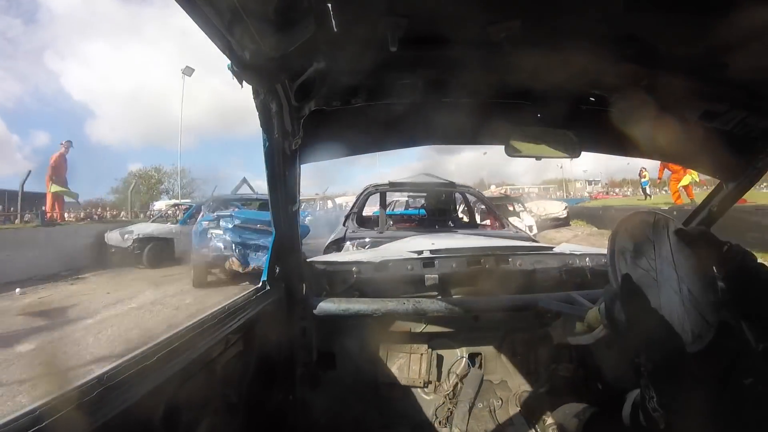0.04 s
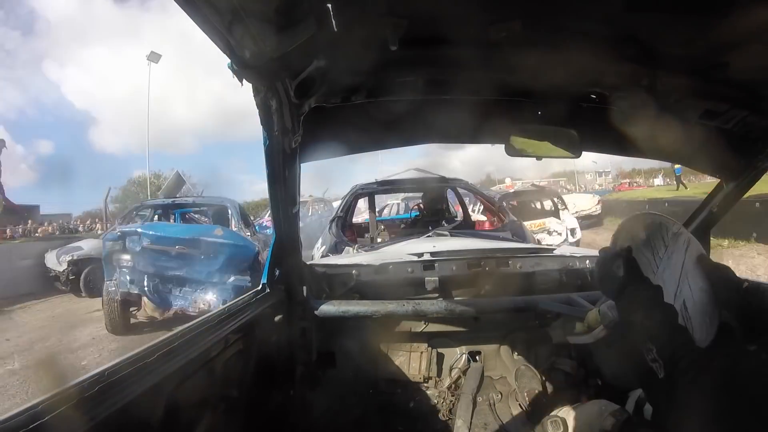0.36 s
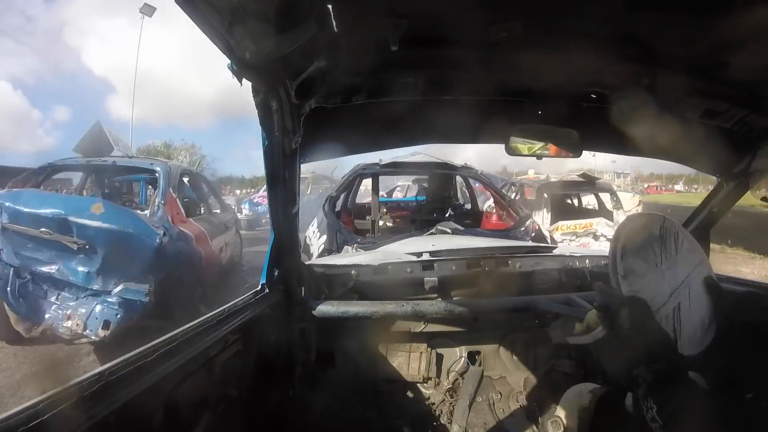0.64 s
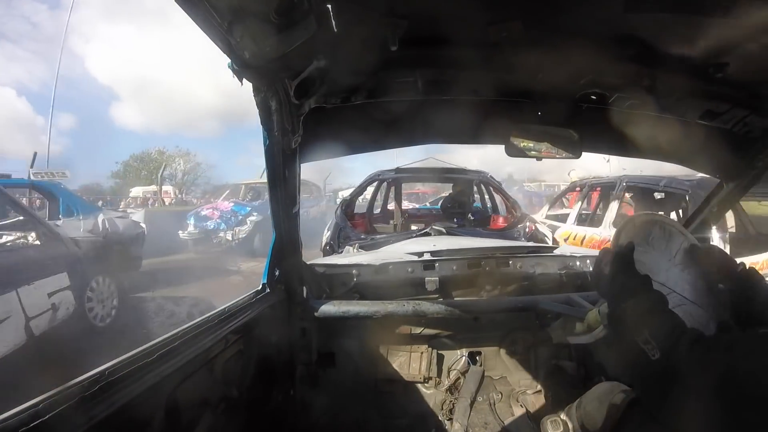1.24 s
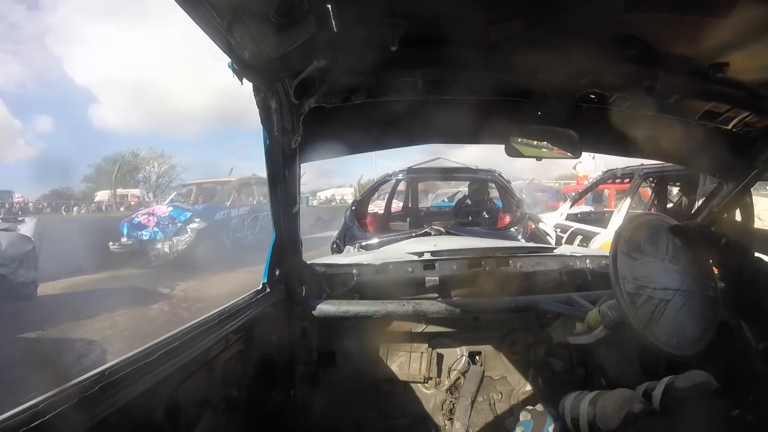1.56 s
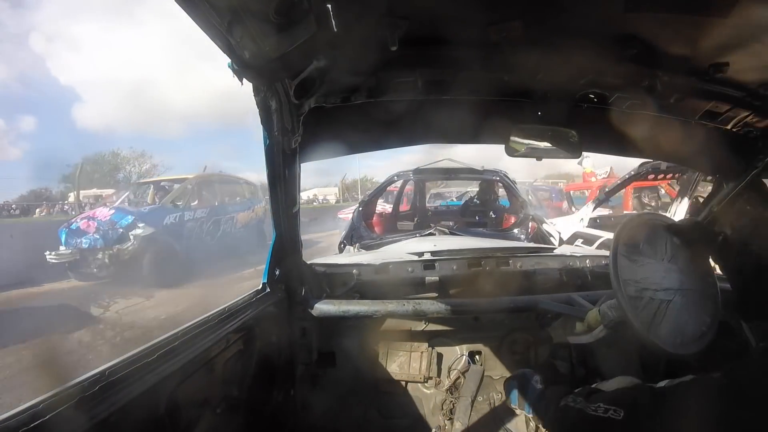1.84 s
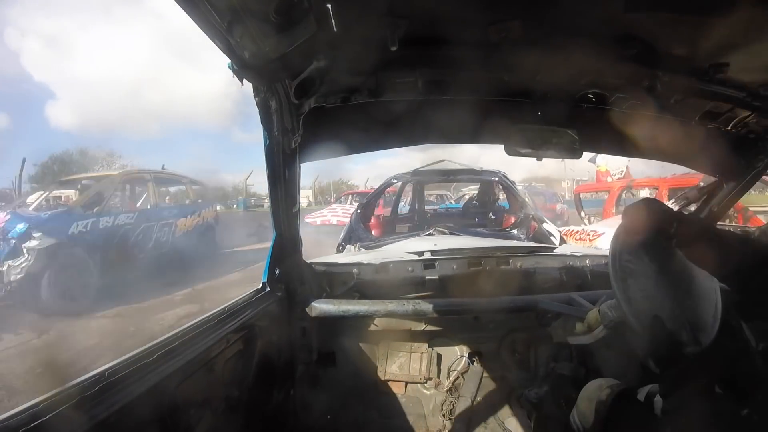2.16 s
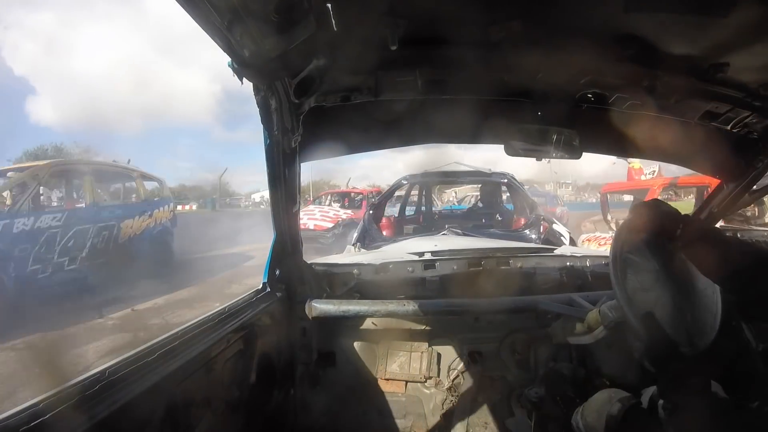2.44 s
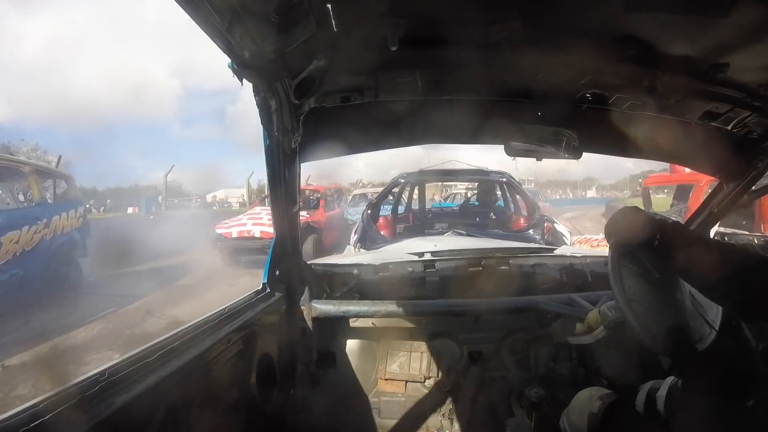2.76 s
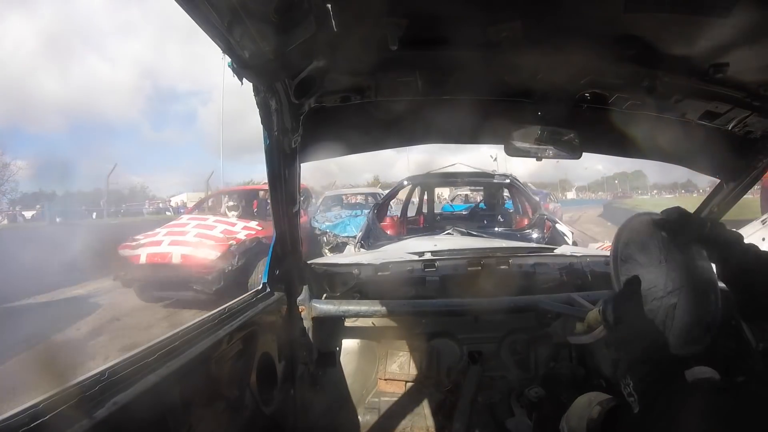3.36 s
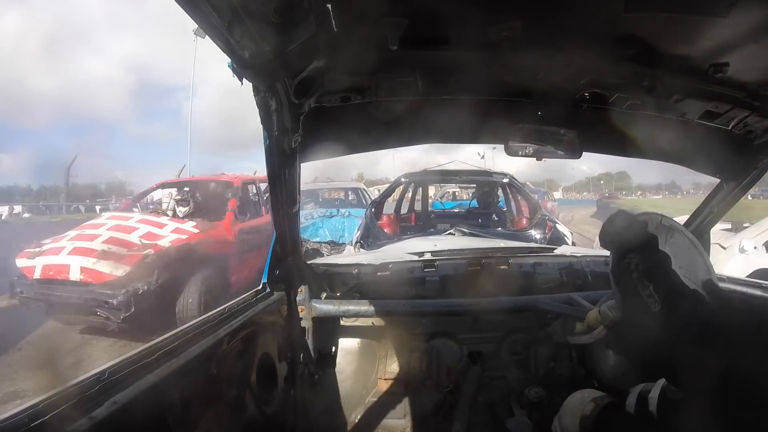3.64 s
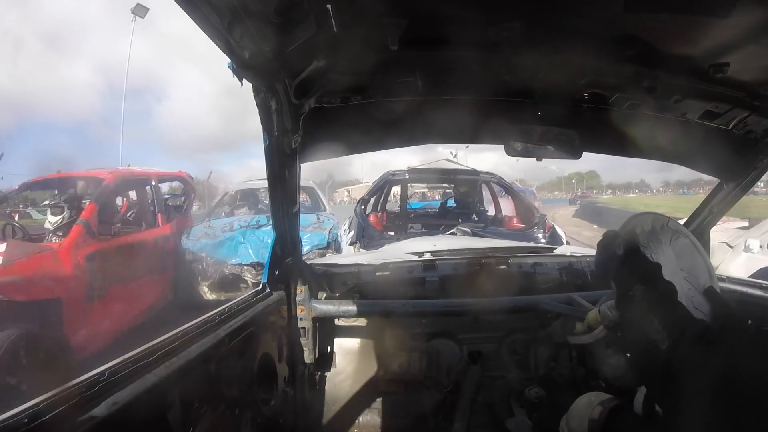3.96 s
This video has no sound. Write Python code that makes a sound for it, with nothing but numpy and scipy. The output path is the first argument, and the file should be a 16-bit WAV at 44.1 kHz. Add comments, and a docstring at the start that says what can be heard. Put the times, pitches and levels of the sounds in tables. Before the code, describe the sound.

A rough race car engine surges and drops, heard from inside the stripped cabin. The body booms over bumps, and loose metal knocks and clanks in two main bursts, while grit sprays and other cars drone nearby.

```python
"""Inside a banger-racing car.

On a dusty oval, the four-cylinder engine of a stripped car surges and drops with the throttle: exhaust
pulses, pipe tones, block clatter, intake rasp and hiss. The bare shell booms over the bumps, loose
metal knocks and rattles, grit sprays the body and other cars drone around it."""
import sys
import numpy as np
from scipy import signal
from scipy.fft import rfft, irfft, next_fast_len
from scipy.io import wavfile
from scipy.ndimage import uniform_filter1d

SR = 44100
rng = np.random.default_rng(int(sys.argv[2]) if len(sys.argv) > 2 else 0)


def log_audio(samples):
    """Write samples as a 16-bit WAV file to the path given in sys.argv[1]."""
    # one column per channel
    frames = np.atleast_2d(samples).T
    # limit to full scale, then quantise
    limited = np.clip(frames, -1, 1)
    pcm = np.round(limited * 32767).astype(np.int16)
    wavfile.write(sys.argv[1], SR, pcm)


N = 176400


def amp(db):
    """Decibels to gain."""
    return 10 ** (np.asarray(db) / 20)


def unit(x):
    """Scale to rms 1."""
    return x / np.sqrt(np.mean(x ** 2) + 1e-18)


def curve(rows):
    """Linear interpolation of (t/s, value) rows."""
    return np.interp(np.arange(N) / SR, *np.array(rows, float).T)


def colour(x, points):
    """Minimum-phase filter from (f/Hz, level/dB) rows, 24 dB/octave skirts; output rms 1."""
    size = next_fast_len(len(x) + 8192)
    size += size % 2
    hz, db = np.array(points, float).T
    f = np.maximum(np.arange(size // 2 + 1) * SR / size, 1)
    skirt_db = 24 * (np.maximum(np.log2(hz[0] / f), 0) + np.maximum(np.log2(f / hz[-1]), 0))
    cepstrum = irfft(np.log(amp(np.interp(np.log(f), np.log(hz), db) - skirt_db)))
    cepstrum[1:size // 2] *= 2
    cepstrum[size // 2 + 1:] = 0
    return unit(irfft(rfft(x, size) * np.exp(rfft(cepstrum)))[:len(x)])


def drift(rate_hz):
    """Smooth random drift, rms 1."""
    hold = max(int(SR / rate_hz), 2)
    steps = np.repeat(rng.standard_normal(N // hold + 1), hold)
    return unit(uniform_filter1d(uniform_filter1d(steps, hold), hold)[:N])


def wavering_tone(turns, flutter_db, flutter_hz):
    """Sine with a drifting level, rms 1."""
    return unit(np.sin(2 * np.pi * turns) * amp(flutter_db * drift(flutter_hz)))


def ring(hz, t60_s):
    """One decaying mode."""
    t = np.arange(SR // 2) / SR
    return np.sin(2 * np.pi * hz * t) * np.exp(-np.log(1000) * t / t60_s)


def add(out, start_s, x):
    """Mix x into out at start_s."""
    i = int(start_s * SR)
    out[i:i + len(x)] += x[:max(N - i, 0)]


def cabin(x, mean_delay_s=.007):
    """Reflections in the small steel cabin smear each pulse."""
    size = next_fast_len(len(x) + 8192)
    spectrum = rfft(x, size)
    f = np.arange(len(spectrum)) * SR / size
    knots_hz = np.linspace(0, SR / 2, 300)
    delay_s = np.interp(f, knots_hz, mean_delay_s * 2 * rng.random(len(knots_hz)))
    return irfft(spectrum * np.exp(-2j * np.pi * np.cumsum(delay_s) * SR / size), size)[:len(x)]


def strikes(cycles, phases, gains, scatter_db):
    """Impulses at set phases of every engine cycle, scattered in strength."""
    at = (np.arange(int(cycles[-1]) + 1)[:, None] + phases).ravel()
    scatter = amp(scatter_db * rng.uniform(-1.9, 1.9, len(at)))
    strength = np.resize(gains, len(at)) * scatter * (at < cycles[-1])
    position = np.interp(at, cycles, np.arange(N))
    i = position.astype(int)
    frac = position - i
    return (np.bincount(i, strength * (1 - frac), N + 1) + np.bincount(i + 1, strength * frac, N + 1))[:N]


def firings(cycles):
    """One pulse per cycle from each of four unequal cylinders."""
    return strikes(cycles, np.arange(4) / 4, amp([-2.5, 2.15, -1.875, .725]), scatter_db=8.5)


# firing f/Hz, nearest t/s, pass half-width/s, level/dB, relative pitch slope/(1/s)
RIVAL_PASSES = [(104.7,0.483,0.12,-27,-0.0263),(106.3,2.6,0.18,-35,0.028)]
# exhaust spectrum: f/Hz, level/dB
RIVAL_PIPE = [(80,-39.5),(200,31.5),(320,-5),(850,-26),(1400,-13),(3000,-16)]
def rivals():
    """Other engines swell and fade as their cars come alongside."""
    t, out = np.arange(N) / SR, np.zeros(N)
    for hz, nearest_s, width_s, db, slope in RIVAL_PASSES:
        firing_hz = hz * np.exp(slope * (t - nearest_s)) * (1 + .006 * drift(13))
        pulses = cabin(firings(np.cumsum(firing_hz) / SR / 4))
        out += amp(db) * colour(pulses, RIVAL_PIPE) / (1 + ((t - nearest_s) / width_s) ** 2)
    return out


# exhaust note: t/s, f/Hz, level/dB
NEIGHBOUR_NOTE = [(1.5,205,-43),(1.98,170,-27),(2.62,174,-34.5),(2.95,154,-30.5),(3.25,184,-29.5),(4,172,-40)]
def neighbour():
    """The uneven exhaust note of the nearest car sags and picks up again."""
    times_s, hz, db = np.array(NEIGHBOUR_NOTE).T
    turns = np.cumsum(curve(np.c_[times_s, hz]) * (1 + .015 * drift(35.08))) / SR
    return wavering_tone(turns, flutter_db=3.8, flutter_hz=40) * amp(curve(np.c_[times_s, db]))


# showers: t/s, level/dB, decay/s
GRIT_SPRAYS = [(.358,-36.5,0.02),(.416,-31,0.009),(.456,-33.5,0.0093),(.517,-38,0.041),(.587,-37.5,0.019),(1.306,-29.5,0.012),(1.403,-36,.015),(3.514,-37,0.015)]
# spectrum: f/Hz, level/dB
GRIT_SPECTRUM = [(2500,-11),(6500,9),(7800,-4),(9500,0),(15000,-18)]
def grit():
    """Small stones hit the bodywork in short showers."""
    out, t = np.zeros(N), np.arange(SR // 5) / SR
    for start_s, db, decay_s in GRIT_SPRAYS:
        grains = rng.standard_normal(len(t)) * amp(9.8 * np.minimum(rng.exponential(size=len(t)), 4))
        envelope = 1.26 * np.exp(-t / decay_s) * (1 - np.exp(-t / .001))
        add(out, start_s, amp(db) * colour(grains, GRIT_SPECTRUM) * envelope)
    return out


# dry contact spectrum: f/Hz, level/dB
CRACK_SPECTRUM = [(300,1),(850,-3.5),(1650,6.5),(2900,3.5),(5000,-21),(6300,-19.5),(13000,-44.5)]
def rattle(hits, modes, focus_db_per_octave=31):
    """Each blow is a brief chatter of contacts that cracks and rings the metal, most near centre_hz."""
    out, t = np.zeros(N), np.arange(SR // 2) / SR
    for start_s, db, centre_hz, chatter_s, crack_db in hits:
        envelope = np.exp(-t / chatter_s) * (1 - np.exp(-t / (.34 * chatter_s)))
        contact = rng.standard_normal(len(t)) * envelope
        force = colour(contact, [(modes[0][0], 0), (modes[-1][0], 0)])
        ringing = 0
        for hz, mode_db, t60_s in modes:
            detuned_hz = hz * (1 + .006 * rng.standard_normal())
            mode = unit(signal.fftconvolve(force, ring(detuned_hz, t60_s))[:len(t)])
            ringing += amp(mode_db - focus_db_per_octave * abs(np.log2(hz / centre_hz))) * mode
        hit = unit(ringing) + amp(crack_db) * colour(contact, CRACK_SPECTRUM)
        max_rms = np.sqrt(uniform_filter1d(hit ** 2, size=200).max())
        add(out, start_s, amp(db) * hit / (2 * max_rms))
    return out


# blows: t/s, level/dB, centre f/Hz, chatter decay/s, crack over ring/dB
PANEL_KNOCKS = [(.179,-15.5,1500,0.0045,5),(.203,-15.5,2000,0.0024,11),(.262,-13,1620,0.007,9),(.609,-19,1620,0.021,-1),(.803,-15,1620,0.02,7),(.86,-17.5,1270,.025,3.5),(1.307,-13,1610,0.0085,0.5),(2.121,-10,1590,0.0039,-2.5),(2.156,-13,1200,0.0078,-13),(2.18,-2,1840,0.0028,-4.5),(2.258,-17.5,1700,0.0079,-22),(2.294,-16,1200,.022,-3),(2.37,-14.5,1330,0.012,-12),(2.43,-12.5,1750,0.019,-0.5),(2.604,-11,1500,0.014,2),(3.339,-13,1750,0.0051,-9)]
BAR_CLANKS = [(.334,-18.5,3070,0.0086,-5),(.383,-13.5,3330,0.004,-8),(.458,-4.5,2400,0.011,-4.5)]
SCRAP_CLINKS = [(.529,-20,8200,0.003,-13),(1.999,-27.5,5500,0.011,-20)]
# modes: f/Hz, level/dB, t60/s
PANEL_MODES = [(983,2,.04),(1298,10.5,0.13),(1310,6,0.072),(1631,13.5,0.11),(1832,9,0.058),(1900,10,.045),(2670,10,.03)]
BAR_MODES = [(1660,-1,0.15),(2190,1,0.075),(2280,-1.2,0.036),(2564,1.2,0.18),(2620,1.2,0.082),(3396,1.1,0.028)]
SCRAP_MODES = [(6760,-2,0.016),(7400,-6,0.037),(8050,-13,.025),(12900,-10,.04)]
def loose_metal():
    """Panels knock, a loose bar clanks, small scraps clink."""
    knocks = rattle(PANEL_KNOCKS, PANEL_MODES)
    return knocks + rattle(BAR_CLANKS, BAR_MODES) + rattle(SCRAP_CLINKS, SCRAP_MODES)


# boom envelope: t/s, level/dB
BOOM_LEVEL = [(0,-17),(.29,-29),(.37,-11),(.46,-28.5),(.56,-13),(.78,-26),(1.08,-21),(1.22,-15.5),(1.32,-25.5),(1.42,-16),(1.6,-26.5),(1.73,-14.5),(2.12,-14),(2.25,-23),(2.48,-15),(2.64,-31),(2.88,-17),(4,-18.5)]
# rumble spectrum: f/Hz, level/dB
SHELL_SPECTRUM = [(25,-17),(50,4),(64,0),(74,13.5),(84,-7.5),(100,-0.5),(130,-13.5),(220,-43)]
# bumps: t/s, thump level/dB, thump f/Hz, floor pan level/dB
BUMPS = [(0.178,0,43,-13),(.606,-3.5,59,-13.5),(2.124,-4.5,67,-12.5),(2.296,-22,70,-8.5),(2.429,-22,70,-12.5),(3.335,-6,63.06,-8)]
def shell(boom_hz=74.47, pan_hz=188.5):
    """The rough track keeps the cabin booming; big bumps thump the shell and the floor pan."""
    turns = np.cumsum(boom_hz * (1 + .0825 * drift(21.99))) / SR
    boom = amp(-2.5) * wavering_tone(turns, flutter_db=4.9, flutter_hz=25.93)
    rumble = amp(-1.5) * colour(rng.standard_normal(N), SHELL_SPECTRUM)
    out = (boom + rumble) * amp(curve(BOOM_LEVEL))
    for start_s, db, hz, pan_db in BUMPS:
        add(out, start_s, -amp(db) * ring(hz, t60_s=.28) - amp(pan_db) * ring(pan_hz, t60_s=.17))
    return out


def machinery(cycles, tap_share, tap_count=48):
    """Metal impacts that repeat each cycle plus gas noise, both pulsing with the firings."""
    pulsing = 1 + .091 * np.cos(2 * np.pi * 4 * cycles)
    flutter = amp(.9 * np.cos(2 * np.pi * cycles) + 1.07 * drift(70))
    taps = unit(cabin(strikes(cycles, rng.random(tap_count), rng.standard_normal(tap_count), 2)))
    gas = rng.standard_normal(N)
    return pulsing * flutter * (np.sqrt(tap_share) * taps + np.sqrt(1 - tap_share) * gas)


# spectra: f/Hz, level/dB
RASP_SPECTRUM = [(1200,-7),(1900,-4),(2550,-1),(3400,0.5),(3800,-13),(4400,-11),(4900,-29.5),(6500,-70)]
HISS_SPECTRUM = [(3500,2.5),(5100,-15.5),(6200,-0.5),(7000,-11.5),(8300,-11),(10500,-21.5),(11500,-18.5),(15000,-36)]
# envelopes: t/s, level/dB
RASP_LEVEL = [(0,-19.5),(.29,-36),(.38,-30),(.6,-30.5),(.73,-37),(.88,-35.5),(1.15,-35.5),(1.65,-30),(2.1,-31),(2.22,-39),(2.56,-40.5),(2.7,-38.5),(3.3,-35),(4,-28)]
HISS_LEVEL = [(0,-32.5),(.14,-35.5),(.24,-51),(.37,-38.5),(.6,-42.5),(.73,-50),(.87,-46),(1.22,-44),(1.33,-37),(2.1,-38),(2.22,-51),(2.57,-50),(2.66,-47.5),(4,-38)]
def intake(cycles):
    """Pulsing gas rasps in the intake, with hiss above."""
    gas = machinery(cycles, tap_share=.33)
    rasp = colour(gas, RASP_SPECTRUM) * amp(curve(RASP_LEVEL))
    return rasp + colour(gas, HISS_SPECTRUM) * amp(curve(HISS_LEVEL))


# block resonances: f/Hz, level/dB
BLOCK_SPECTRUM = [(500,-25),(950,-24),(1150,-5.5),(1480,6.5),(1640,2.5),(1760,-8),(2100,-9.5),(3000,-20)]
# envelope: t/s, level/dB
CLATTER_LEVEL = [(0,-26.5),(.3,-34),(.55,-28),(.75,-37.5),(.9,-32),(1.2,-31.5),(1.67,-22),(1.9,-25.5),(2.1,-22),(2.22,-30.5),(2.57,-37),(2.68,-31),(3.4,-29),(3.68,-23),(4,-23.5)]
def clatter(cycles):
    """Metal impacts and noise ring through the engine block."""
    return colour(machinery(cycles, tap_share=.45), BLOCK_SPECTRUM) * amp(curve(CLATTER_LEVEL))


# envelopes: t/s, level/dB
DRONE_LEVEL = [(0,-14.5),(.15,-11.5),(.21,-34),(1.6,-39),(1.8,-22),(2.45,-35.5),(3.1,-33),(3.3,-20.5),(3.45,-33.5),(4,-32)]
HOWL_LEVEL = [(0,-45.5),(.7,-54),(1.5,-34),(1.66,-28),(1.98,-41.5),(2.08,-30),(2.2,-56),(3.08,-56),(3.2,-37),(3.5,-42),(3.8,-29),(4,-34.5)]
def pipe_tones(crank_turns):
    """The pipe drones at three times the crank rate and howls at six."""
    drone = wavering_tone(3 * crank_turns, flutter_db=2.5, flutter_hz=55)
    howl = wavering_tone(6 * crank_turns, flutter_db=3, flutter_hz=55)
    return drone * amp(curve(DRONE_LEVEL)) + howl * amp(curve(HOWL_LEVEL))


# pipe response: f/Hz, level/dB
PIPE_SPECTRUM = [(60,-26),(130,-2.5),(175,2.5),(270,-2.5),(330,-11),(450,-18),(1000,-21.5),(1600,-49.5)]
# harmonics: multiple of crank rate, level/dB
CRANK_ORDERS = [(2,-16),(4,-1),(5,-26.5),(9,-19),(10,-25)]
# envelope: t/s, level/dB
EXHAUST_LEVEL = [(.16,-27.5),(.29,-37.5),(.58,-29.5),(.74,-39),(.9,-32),(1.1,-34),(1.7,-22.5),(1.99,-25.5),(2.1,-22),(2.22,-36),(2.7,-34),(3.72,-26),(4,-28.5)]
def exhaust(crank_turns):
    """Firing pulses and noise through the pipe, plus wavering crank harmonics."""
    pulses = unit(cabin(firings(crank_turns / 2)))
    puffs = colour(pulses + 1.52 * rng.standard_normal(N), PIPE_SPECTRUM)
    harmonics = sum(amp(db + 4 * drift(14)) * np.sin(2 * np.pi * (order * crank_turns + rng.random()))
                    for order, db in CRANK_ORDERS)
    return amp(curve(EXHAUST_LEVEL)) * (amp(3) * puffs + amp(-1.5) * harmonics)


# engine speed: t/s, firing f/Hz
FIRING_RATE = [(0,124.8),(.25,130),(.45,120.7),(1,108.1),(1.38,113.9),(1.52,111.1),(1.71,128.3),(1.97,115.8),(2.08,124.6),(2.22,115.2),(2.52,113.3),(2.7,127.1),(3.2,129.7),(3.45,123.4),(3.66,115.3),(3.86,127.7),(4,128.1)]
def engine():
    """Four-cylinder four-stroke: two firings per crank turn, two turns per cycle."""
    crank_turns = np.cumsum(curve(FIRING_RATE) * (1 + .005 * drift(40))) / SR / 2
    cycles = crank_turns / 2
    return exhaust(crank_turns) + pipe_tones(crank_turns) + clatter(cycles) + intake(cycles)


def scene():
    """Mono mix in the cabin."""
    return (loose_metal() + engine() + rivals() + neighbour() + shell() + grit())[None]


def record(dry):
    """Hard limit at full scale, then a steep low-pass."""
    cutoff_hz = 15200
    return signal.sosfilt(signal.ellip(8, .2, 70, cutoff_hz, fs=SR, output="sos"), np.clip(dry, -1, 1))


dry = scene()
out = record(dry)
log_audio(out)
```